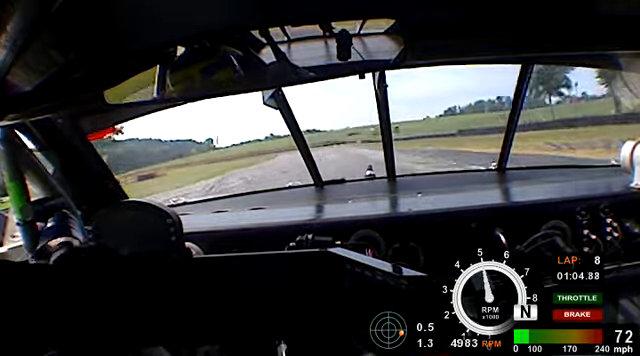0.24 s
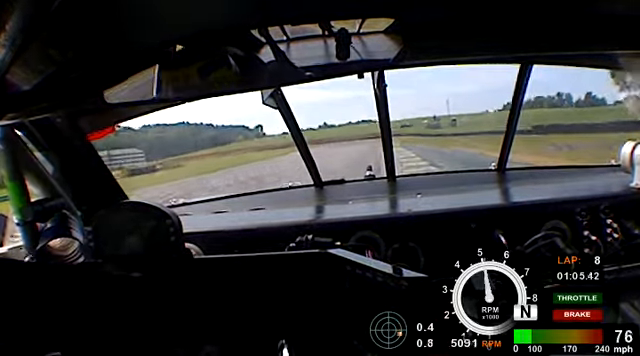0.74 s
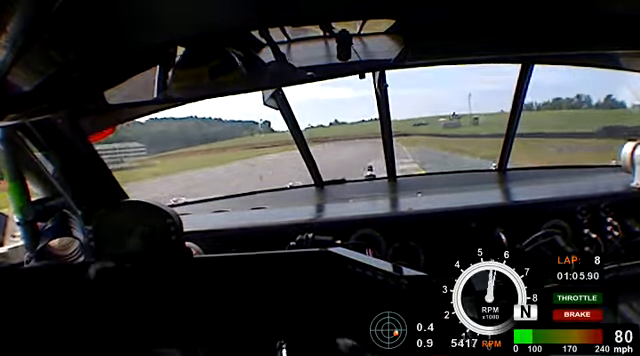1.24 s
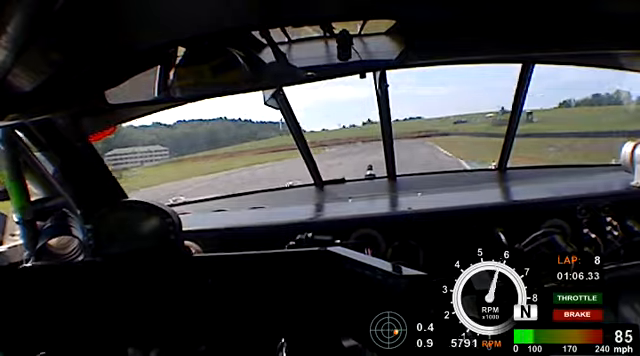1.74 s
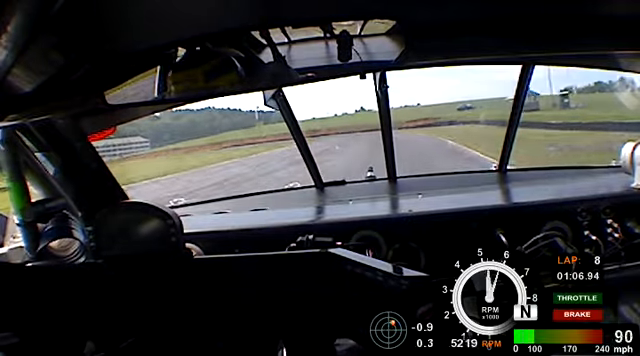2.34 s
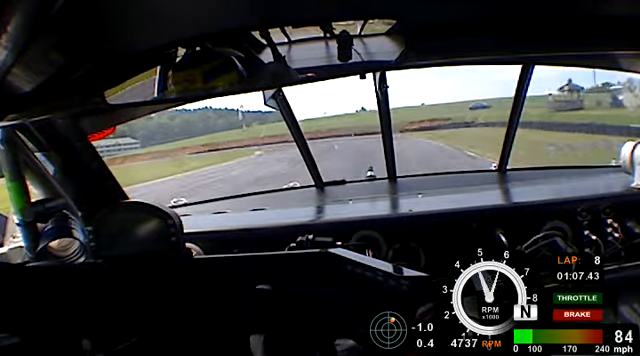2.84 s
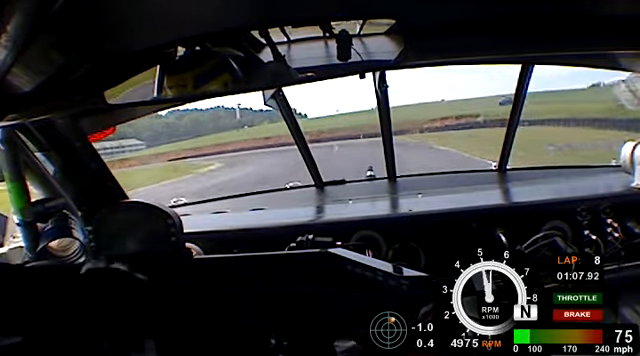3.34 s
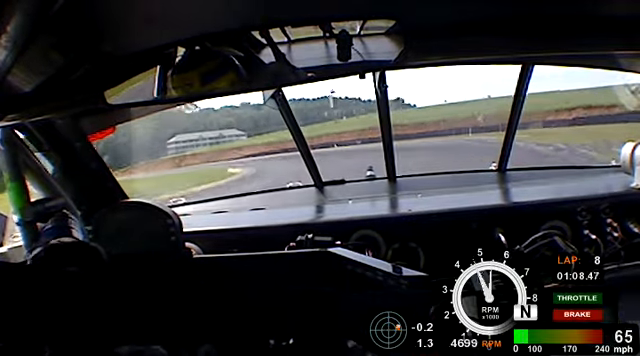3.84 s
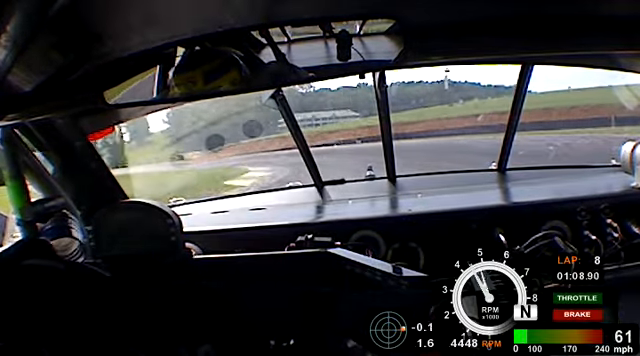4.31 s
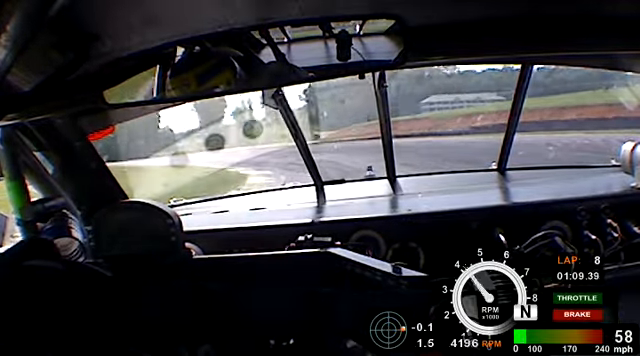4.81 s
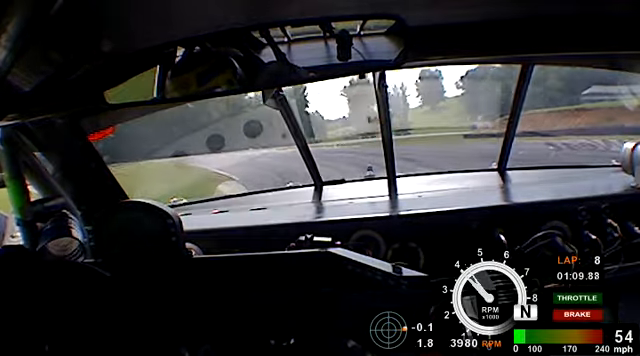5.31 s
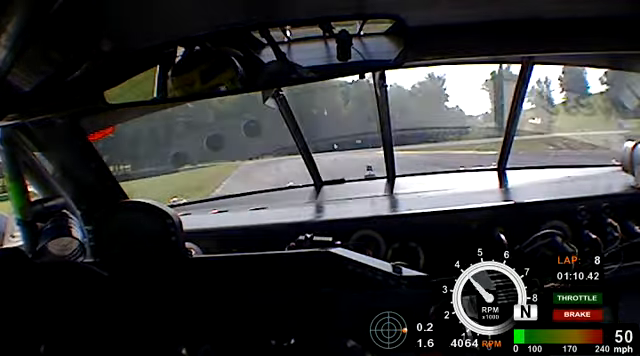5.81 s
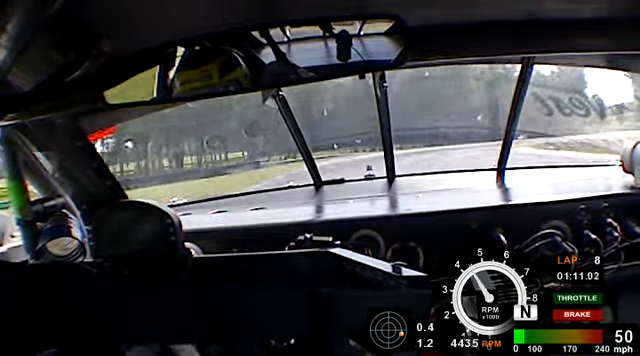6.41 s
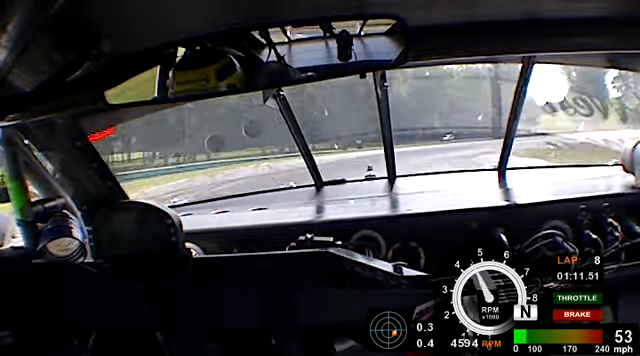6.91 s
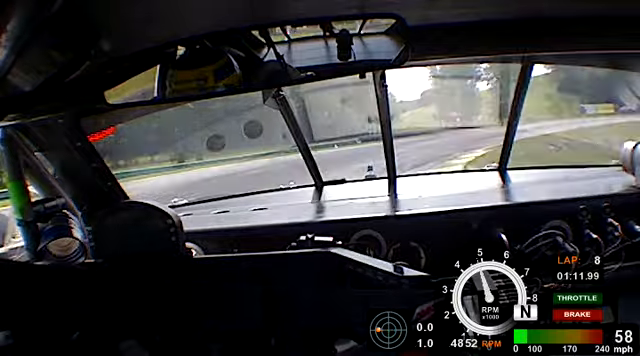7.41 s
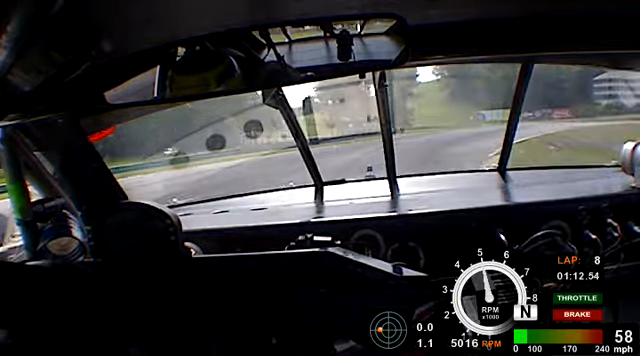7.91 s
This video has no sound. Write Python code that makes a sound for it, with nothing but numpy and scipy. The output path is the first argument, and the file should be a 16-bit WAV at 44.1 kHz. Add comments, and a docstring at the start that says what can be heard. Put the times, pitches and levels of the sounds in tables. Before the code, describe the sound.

A V8 race car engine booms and rasps at full throttle, heard from inside the bare cockpit. Bumps thump the body and rattle loose metal. The driver lifts off, blips the throttle for a downshift, and the revs sink through a long coast with a high gear whine. After a clunk the engine pulls again, rising in pitch over steady tyre and road rumble.

```python
"""Inside the bare cockpit of a V8 race car: full throttle over bumps, off the gas, a blip and a
downshift, a long coast into a corner, then power again. Exhaust pulses boom in the cockpit, burning
fuel rasps, the intake hisses and straight-cut gear teeth whine. The road shakes the body and rattles
its loose metal. Engine speed is in four-stroke cycles per second (Hz); an "order" is a tone at a
whole multiple of that speed."""
import sys
import numpy as np
from scipy import signal
from scipy.fft import rfft, irfft, next_fast_len
from scipy.io import wavfile

SR = 44100
rng = np.random.default_rng(int(sys.argv[2]) if len(sys.argv) > 2 else 0)


def digitize_waveform(pressure):
    """Quantize a signal to 16-bit integers and store it at the path in sys.argv[1].

    Rows of a 2-D input are taken as channels; values are limited to [-1, 1].
    """
    field = np.atleast_2d(pressure).T
    bounded = np.clip(field, -1, 1)
    quanta = np.round(bounded * 32767).astype(np.int16)
    wavfile.write(sys.argv[1], SR, quanta)


N = 359415

# how fast the engine turns: time_s, speed_hz
ENGINE_SPEED = [(0, 39.7), (.23, 42.3), (.48, 43.3), (.7, 43.4), (1.15, 45.1), (1.27, 46.5), (1.89, 50),
                (2.03, 44.5), (2.25, 43.1), (2.72, 38.6), (2.88, 45.9), (3.29, 41.1), (3.65, 39.7),
                (4.62, 35.2), (5.34, 31.8), (5.65, 33.4), (6.25, 36.8), (6.55, 38), (6.71, 37.6),
                (6.85, 39), (7.14, 40.1), (7.64, 40.85), (7.76, 41.6), (7.84, 40.7), (8.04, 42.6),
                (8.15, 42.4)]
# the gas pedal, from 0 (shut) to 1 (full): time_s, throttle
THROTTLE = [(0, 0.9), (.25, 0.94), (1.84, 0.77), (1.9, 0.02), (2.69, 0), (2.78, 0.3), (2.87, 0), (5.2, 0),
            (5.38, 0.19), (5.58, 0), (5.76, 1), (6.4, 1), (6.65, 0.55), (6.71, 0.05), (6.9, 0.18),
            (7.15, 0.26), (7.7, 0.47), (7.95, 0.73), (8.15, 0.6)]
# how hard the engine works, given as the loudness of its rasp: time_s, level_db
EFFORT = [(0.0, -29), (0.04, -28), (0.16, -26.5), (0.84, -25), (1.84, -25), (1.9, -33.5), (1.95, -28),
          (2.13, -31), (2.25, -30), (2.31, -33.5), (2.47, -33), (2.74, -34), (2.93, -29), (3.09, -32.5),
          (4.7, -36.5), (4.81, -39), (5.33, -40.5), (5.65, -37.5), (5.92, -30.5), (6.4, -28), (6.65, -29),
          (6.74, -36), (7.74, -33.5), (7.78, -30), (7.83, -34.5), (7.94, -28.5), (8.15, -29.5)]
# the deep exhaust tones: order, level_db, full_throttle_change_db, coasting_change_db_per_hz
LOW_ORDERS = [(1, -19, 1, -0.3), (2, -23.5, 6, -1), (3, -21, -8.5, .1), (4, -36.5, -7.5, -0.34),
              (5, -32, 3, 0), (6, -30.5, -5, 0.5), (8, -40.5, 2.5, 0.62)]
# how the air in the cockpit boosts some pitches and swallows others: pitch_hz, gain_db
COCKPIT_AIR = [(32, -23.5), (42, -8), (66, -13.5), (80, -15.5), (98, -7.5), (111, -10), (120, 0), (135, 7),
               (150, 13), (165, 1), (183, 13), (200, 3.5), (220, 4.5), (240, 6), (260, -0.5), (279, 5),
               (297, -8), (312, 14), (328, 1), (365, -0.5), (395, 3.5)]
# each row of cylinders fires unevenly, which favours some orders: order, gain_db
ORDER_GAINS = [(7, 0), (9, 2), (10, -3), (11, 3.5), (12, 1), (13, -0.5), (14, 1.5), (15, 3), (16, 4),
               (17, -12.5), (18, -4.5), (19, -1), (20, 1), (21, 0)]
# tone of the exhaust bark, combustion rasp and intake hiss: pitch_hz, level_db
BARK_SPECTRUM = [(220, 4), (330, -16), (400, -9.5), (460, -2.5), (530, -21.5), (700, -17), (860, -9.5),
                 (1050, -24.5), (1500, -18.5), (1700, -20), (1900, -18.5), (2500, -21.5), (2850, -17.5),
                 (3130, -18.5), (3450, -48)]
RASP_SPECTRUM = [(300, -5), (450, 6.5), (680, -5), (860, 5), (1050, -8.5), (1400, 4), (1700, -2.5),
                 (2000, 2.5), (2400, -0.5), (2800, -4), (3130, 0), (3420, -17), (4500, -13.5), (7000, -35)]
HISS_SPECTRUM = [(2000, -26.5), (3400, 4.5), (3540, -7.5), (4540, -1.5), (5240, -6), (5900, -2), (6410, -9),
                 (7210, -6), (7690, -13), (8000, -17.5), (10400, -49.5), (17600, -120)]
# where the bare panels ring: pitch_hz, width_hz, boost_db
PANEL_RESONANCES = [(484, 10, 6), (625, 14, 6.5), (850, 19, 3.5), (1671, 24, 10), (1753, 130, 5.5),
                    (2296, 74, 4.5), (2540, 5.2, 9.5), (3120, 60, 4), (3680, 50, 7), (4720, 130, 2.5),
                    (6060, 41, 2), (6650, 120, 2.5)]
# where the gearbox casing rings: pitch_hz, width_hz, level_db
CASING_RESONANCES = [(1091, 20, -32.5), (1187, 36, -27.5), (1256.3, 39.6, -21.5), (1360, 32, -30.5),
                     (1550, 14, -34), (1631, 24, -19.5), (1720, 28, -20.5), (1818, 73, -25)]
# surges press the gear teeth together or let them float: time_s, half_length_s, whine_change_db
GEAR_SURGES = [(1.957, 0.094, -14), (2.31, .02, -6), (2.777, 0.026, -14), (3.093, 0.04, 11.5),
               (3.37, .04, 6.5), (3.442, .025, -14.5), (3.627, 0.038, -11), (4.052, 0.023, -13.5),
               (4.2, 0.011, -9.5), (4.278, 0.051, 5.5), (4.414, 0.082, -3.5), (5.31, 0.049, 4.5),
               (5.402, .035, -17), (6.163, 0.021, -13), (6.812, .012, -6), (6.95, 0.053, -11.5),
               (7.085, 0.024, -10.5), (7.866, 0.026, -13.5)]
# rough stretches of track: start_s, length_s, level_db
ROUGH_TRACK = [(0.558, 0.43, -15.5), (1.757, .08, -17.5), (1.92, 0.094, -19), (2.3, 0.4, -25.5),
               (2.743, 0.052, -20.5), (4.15, 0.044, -25.5), (7.742, 0.043, -17), (7.924, .09, -14.5)]
# tone of the shaking body, and of tyres and air: pitch_hz, level_db
RUMBLE_SPECTRUM = [(20, -13.5), (35, 4), (55, -3.5), (75, 3), (105, 0), (145, 6), (220, 4), (290, -9),
                   (380, -12), (520, -7), (900, -31)]
ROLLING_SPECTRUM = [(18, 2), (32, 12.5), (50, 8.5), (100, -7.5), (280, -8), (450, 2), (650, -13),
                    (860, -1.5), (1200, 0.5), (1700, -11), (3000, -39)]
# bumps slam the suspension, loose metal clatters, driveline slack snaps shut: start_s, peak_db
BUMPS = [(0.577, -1.5), (0.613, 2.5), (0.633, -0.5), (0.937, 0.5), (0.975, -5.5), (1.931, -24),
         (4.169, -14), (7.994, -7)]
RATTLES = [(.637, -15), (.724, -14), (.827, -9), (.876, -19), (.933, -12.5), (.964, -8), (.994, -11),
           (1.576, -10.5), (1.748, -12.5), (1.865, -16), (1.934, -10), (2.014, -14), (2.779, -23),
           (2.825, -17.5), (4.269, -20), (4.722, -24), (7.854, -16), (7.945, -14), (7.973, -10),
           (7.996, -10), (8.023, -15), (8.084, -12)]
CLUNKS = [(1.924, -15), (2.78, -30), (5.44, -11)]
# the notes each part rings with, and their time to fade by 60 dB: pitch_hz, level_db, ring_s
CHASSIS_MODES = [(73, -8, 0.053), (144, 7.5, 0.14), (217.4, 2, 0.14), (344, -4.5, 0.054), (391, -2, 0.098)]
METAL_MODES = [(3650, -6.5, 0.0037), (3940, 13.5, 0.012), (4260, 9.5, 0.009), (4750, 1.5, 0.0046),
               (5440, -2.5, 0.0054), (5600, 1, 0.0057), (7100, -14, 0.0029)]
DRIVELINE_MODES = [(470, 1, .04), (774, 3.5, 0.08), (850, 9, 0.057), (930, 5, 0.046), (1330, -6, .054),
                   (2300, -14, .02), (3220, -10, .022), (4500, -27, .022)]

CRUISE_HZ, FULL_EFFORT_DB = 40, -25.5  # the engine speed and effort that levels are counted from
THIRD_GEAR, SECOND_GEAR = 41.8, 33.55  # tooth contacts per engine cycle
SHIFT_START_S, SHIFT_END_S = 2.72, 2.88
DRIVE_THROTTLE = .3  # enough throttle to press the gear teeth fully together
TIME_S = np.arange(N) / SR


def exhaust_boom(angle, speed, throttle):
    """The lowest orders swell in the cockpit's air and add up to one lumpy thump each cycle."""
    # on a barely open throttle the engine neither pulls nor brakes, and the boom sinks
    lull_db = -5 * np.exp(-((throttle - .16) / .2) ** 2)
    out = np.zeros(N)
    for order, db, throttle_db, coast_db_per_hz in LOW_ORDERS:
        lag = .22 * order ** 2  # higher orders arrive later
        load_db = throttle_db * throttle + coast_db_per_hz * (1 - throttle) * (speed - CRUISE_HZ)
        level_db = db + load_db + lull_db + level_at(COCKPIT_AIR, order * speed)
        out += from_db(level_db) * unsteady_tone(order * angle - lag, rough=.26, wander_hz=2.2)
    return out


def exhaust_bark(angle, speed, throttle, effort_db, pipe_hz=468, pipe_width_hz=13):
    """Higher orders bark harder under power; those below 14 also ring the exhaust pipe."""
    bark_db = -25.5 + 1.26 * (effort_db - FULL_EFFORT_DB) + throttle * (speed - CRUISE_HZ)
    push = np.clip((effort_db + 28.5) / 7, 0, 1)
    out = np.zeros(N)
    for order in [7, *range(9, 80)]:
        hz = order * speed
        if order < 14:
            near_pipe = 1 / (1 + ((hz - pipe_hz) / pipe_width_hz) ** 2)
            level_db = bark_db + 8.5 * push * (near_pipe - .6)
        else:
            level_db = effort_db - 3 + 5 * push
        if order > ORDER_GAINS[-1][0]:
            level_db += 3.5 * rng.uniform(-1.5, 1.2)  # unequal pipes make some orders stand out
        level_db += level_at(BARK_SPECTRUM, hz) + np.interp(order, *np.transpose(ORDER_GAINS))
        phase = order * angle + rng.uniform(0, 2 * np.pi)
        out += from_db(level_db) * unsteady_tone(phase, rough=.08 + .0022 * order, wander_hz=5.4)
    return out


def firing_noise(angle, spectrum, lope_db, flutter_db):
    """Rushing gas puffs with each of the eight firings; the uneven rows add a limping beat, the lope."""
    puff_db = np.cos(8 * angle)
    lope = np.cos(angle) + np.cos(3 * angle + 1) + np.cos(5 * angle)
    loudness = from_db(puff_db + lope_db * lope + flutter_db * wander(37))
    return shape_tone(loudness * rng.standard_normal(N), spectrum)


def ring_panels(sound):
    """The bare panels boost any sound that comes near one of their own pitches."""
    out = sound
    for hz, width_hz, boost_db in PANEL_RESONANCES:
        decay = np.exp(-np.pi * width_hz / SR)
        feed = np.array([1, 0, -1]) * (1 - decay ** 2) / 2
        feedback = [1, -2 * decay * np.cos(2 * np.pi * hz / SR), decay ** 2]
        out = out + (from_db(boost_db) - 1) * signal.lfilter(feed, feedback, sound)
    return out


def gear_whine(speed, throttle, effort_db):
    """Gear teeth sing as they meet, less steadily when the whine is weak; the shaft's turn sways them."""
    tooth_hz = tooth_rate(speed)
    angle = tooth_angle(tooth_hz)
    drive = np.clip(throttle / DRIVE_THROTTLE, 0, 1)
    whine_db = whine_level(tooth_hz, drive)
    slack = np.interp(whine_db, [-24, -14], [.36, .08])
    main = from_db(whine_db) * unsteady_tone(angle, rough=slack, wander_hz=38)
    # teeth pressed by engine power add overtones
    bite_db = np.minimum(whine_db - 14, 2 * effort_db + 21)
    overtones = from_db(bite_db) * unsteady_tone(2 * angle, rough=.11, wander_hz=31)
    overtones += from_db(bite_db - 8.5) * unsteady_tone(3 * angle, rough=.49, wander_hz=20)
    # two other gear pairs: one sings above, one growls below
    upper = from_db(.5 * whine_db - 24) * unsteady_tone(7 / 6 * angle, rough=.15, wander_hz=14)
    growl_db = -43 + .75 * (speed - CRUISE_HZ) + 5.9 * drive
    growl = from_db(growl_db) * unsteady_tone(.76 * angle, rough=2.1, wander_hz=50)
    shaft = turning_angle(speed)
    sway = 1 + .061 * np.cos(shaft) + .098 * np.cos(2 * shaft) + .1 * np.cos(3 * shaft)
    in_second_gear = TIME_S > SHIFT_END_S
    return sway * (main + (overtones + upper + growl) * in_second_gear)


def tooth_rate(speed):
    """Tooth contacts per second follow the car's speed, so they glide through the shift."""
    in_gear = (TIME_S < SHIFT_START_S) | (TIME_S > SHIFT_END_S)
    tooth_hz = speed * np.where(TIME_S < SHIFT_END_S, THIRD_GEAR, SECOND_GEAR)
    return np.interp(TIME_S, TIME_S[in_gear], tooth_hz[in_gear])


def tooth_angle(tooth_hz, pickup_s=5.445, swing_hz=4.18, fade_s=.1138):
    """The whine's pitch wavers, and swings as throttle in the corner winds up the driveline."""
    since_s = np.maximum(TIME_S - pickup_s, 0)
    swing = .1117 * (since_s > 0) * np.exp(-since_s / fade_s) * np.cos(2 * np.pi * swing_hz * since_s)
    return turning_angle(tooth_hz * (1 + swing + .0014 * wander(12)))


def whine_level(tooth_hz, drive):
    """The whine, in dB, swells where the casing rings and follows the load on the teeth."""
    power = from_db(-40) ** 2  # the floor between resonances
    for hz, width_hz, db in CASING_RESONANCES:
        power += (from_db(db) / (1 + ((tooth_hz - hz) / width_hz) ** 2)) ** 2
    drive_db = drive * np.where(TIME_S < SHIFT_END_S, -7.5, 9)  # softer in third, louder in second
    surge_db = sum(db * np.exp(-((TIME_S - at_s) / half_s) ** 2) for at_s, half_s, db in GEAR_SURGES)
    return 10 * np.log10(power) + drive_db + surge_db


def body_shake(speed, throttle, rise_s=.038, fade_s=.13):
    """How hard the body shakes: more with engine speed and throttle, and on each rough stretch."""
    power = from_db(-31 + 5.5 * throttle + .6 * (speed - CRUISE_HZ)) ** 2
    for start_s, length_s, db in ROUGH_TRACK:
        rise = np.clip((TIME_S - start_s) / rise_s, 0, 1)
        fade = np.exp(-np.maximum(TIME_S - start_s - length_s, 0) / fade_s)
        power += (from_db(db) * rise * fade) ** 2
    return np.sqrt(power)


def loose_metal(effort_db, shake):
    """Loose parts clatter, and tick at random: more often with effort and shake, harder with effort."""
    ticks_per_s = 32 * from_db(effort_db - FULL_EFFORT_DB) + 300 * shake
    ticking = rng.random(N) < ticks_per_s / SR
    peak_db = effort_db + .5 + 1.2 * rng.standard_normal(N)
    ticks = zip(TIME_S[ticking], peak_db[ticking])
    return strike([*RATTLES, *ticks], METAL_MODES, scatter_s=.00079)


def road(shake):
    """The body rumbles and bumps thump the chassis over the steady roar of tyres and air."""
    rumble = shake * shape_tone(rng.standard_normal(N), RUMBLE_SPECTRUM)
    thumps = strike(BUMPS, CHASSIS_MODES, scatter_s=.0059)
    roar = from_db(-33.5) * shape_tone(rng.standard_normal(N), ROLLING_SPECTRUM)
    return rumble + thumps + roar


def strike(events, modes, scatter_s):
    """Each hit is a quick scatter of tiny contacts that sets a part ringing."""
    t = np.arange(SR // 8) / SR
    ring = sum(from_db(db - 60 * t / ring_s) * np.sin(2 * np.pi * hz * t) for hz, db, ring_s in modes)
    out = np.zeros(N + SR)
    for start_s, peak_db in events:
        contacts = rng.standard_normal(len(t)) * np.exp(-t / scatter_s)
        hit = signal.fftconvolve(ring, contacts)[:len(t)]
        start = int(start_s * SR)
        out[start:start + len(t)] += from_db(peak_db) * hit / abs(hit).max()
    return out[:N]


def unsteady_tone(angle, rough, wander_hz):
    """A tone that wobbles in strength and timing, with an average power near 1."""
    tone = (1 + rough * wander(wander_hz)) * np.sin(angle)
    jitter = rough * wander(wander_hz) * np.cos(angle)
    return np.sqrt(2 / (1 + 2 * rough ** 2)) * (tone + jitter)


def wander(rate_hz):
    """A smooth random wobble, typically about 1 in size."""
    step, warm_up = 40, 2000
    decay = np.exp(-2 * np.pi * step * rate_hz / SR)
    noise = rng.standard_normal(N // step + warm_up + 2)
    slow = signal.lfilter([1], [1, -2 * decay, decay ** 2], noise)[warm_up:]
    return np.interp(np.arange(N) / step, np.arange(len(slow)), unit_power(slow))


def shape_tone(sound, spectrum):
    """Give a sound the tone of a spectrum, fading beyond its ends, at an average power of 1."""
    size = next_fast_len(N)
    hz = np.arange(size // 2 + 1) * SR / size + 1e-3
    low_cut = 1 / (1 + (.8 * spectrum[0][0] / hz) ** 6)
    high_cut = 1 / (1 + (hz / spectrum[-1][0] / 1.3) ** 6)
    gain = from_db(level_at(spectrum, hz)) * low_cut * high_cut
    return unit_power(irfft(rfft(sound, size) * gain, size)[:N])


def level_at(spectrum, hz):
    """Look up a spectrum's level in dB at any pitch."""
    pitch_hz, level_db = np.transpose(spectrum)
    return np.interp(np.log(hz + 1e-3), np.log(pitch_hz), level_db)


def over_time(curve):
    """Join a curve's points to get its value at every sample."""
    return np.interp(TIME_S, *np.transpose(curve))


def turning_angle(hz):
    """Add up a turning speed into the angle turned so far."""
    return 2 * np.pi * np.cumsum(hz) / SR


def from_db(db):
    """Turn decibels into a multiplier."""
    return 10 ** (np.asarray(db) / 20)


def unit_power(sound):
    """Scale a sound to an average power of 1."""
    return sound / np.sqrt(np.mean(sound ** 2) + 1e-20)


def scene():
    """Engine, gearbox, road and loose metal, heard at one spot in the cockpit."""
    speed = over_time(ENGINE_SPEED)
    throttle = over_time(THROTTLE)
    effort_db = over_time(EFFORT)
    shake = body_shake(speed, throttle)
    angle = turning_angle(speed * (1 + .001 * wander(10)))
    exhaust = exhaust_boom(angle, speed, throttle) + exhaust_bark(angle, speed, throttle, effort_db)
    rasp = from_db(effort_db + .13) * firing_noise(angle, RASP_SPECTRUM, lope_db=.1, flutter_db=1.48)
    hiss_db = -32.5 + 1.58 * (effort_db - FULL_EFFORT_DB)  # the hiss grows faster than the rasp
    hiss = from_db(hiss_db) * firing_noise(angle, HISS_SPECTRUM, lope_db=1, flutter_db=.87)
    engine = ring_panels(exhaust + rasp + hiss)
    gears = gear_whine(speed, throttle, effort_db)
    rattles = loose_metal(effort_db, shake)
    clunks = strike(CLUNKS, DRIVELINE_MODES, scatter_s=.0054)
    return (engine + gears + road(shake) + rattles + clunks)[None]


def record(dry, mic_top_hz=7850, cutoff_hz=8500):
    """The microphone misses the highest treble, and the hardest bumps overload it."""
    dulled = signal.sosfilt(signal.cheby1(14, .2, mic_top_hz, fs=SR, output="sos"), dry)
    clipped = np.clip(dulled, -.71, .71)
    return signal.sosfilt(signal.butter(6, cutoff_hz, fs=SR, output="sos"), clipped)


dry = scene()
out = record(dry)
digitize_waveform(out)
```